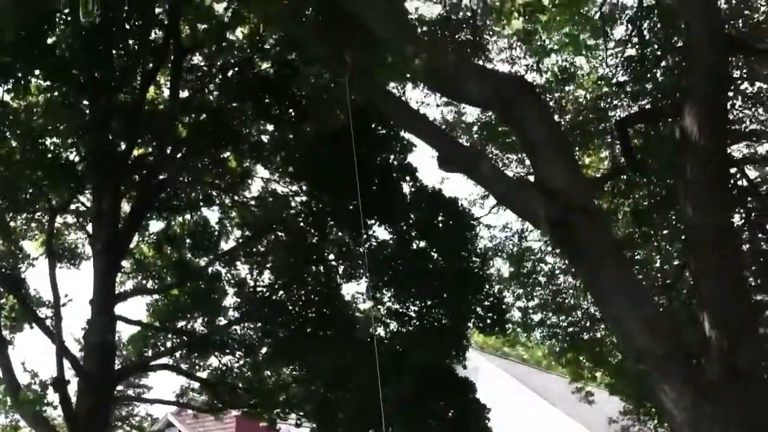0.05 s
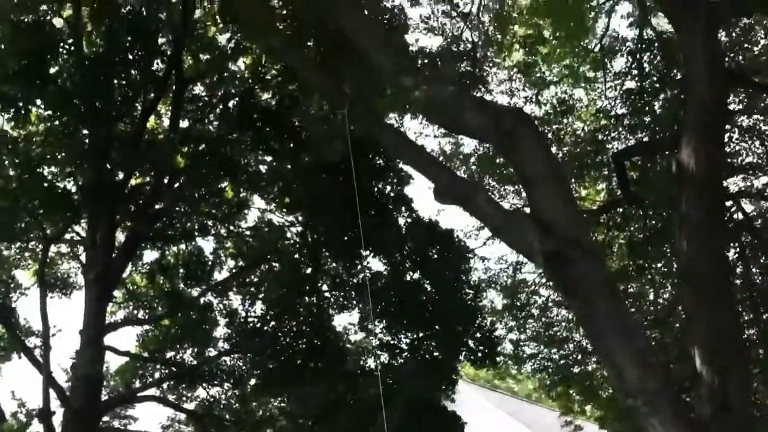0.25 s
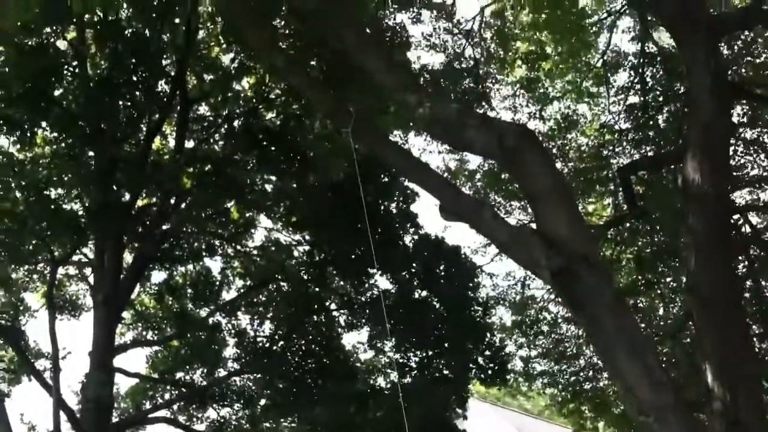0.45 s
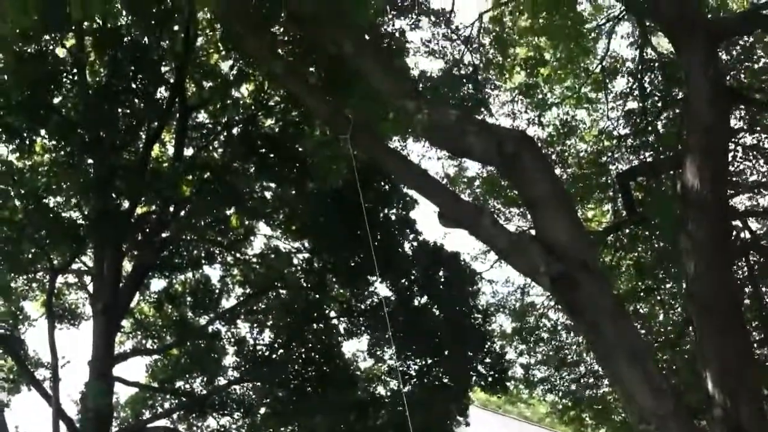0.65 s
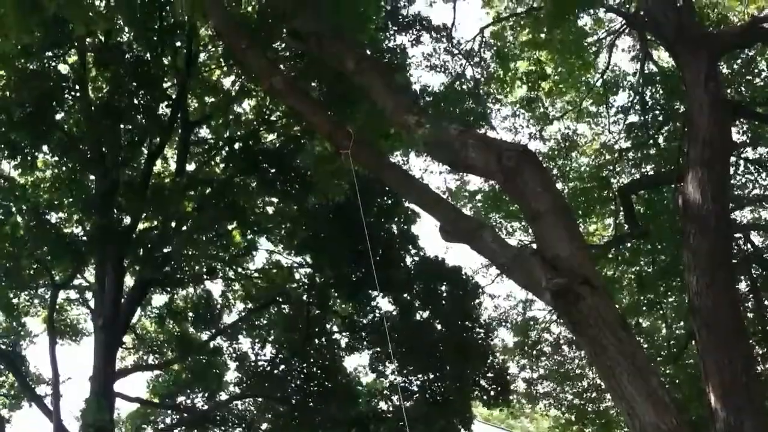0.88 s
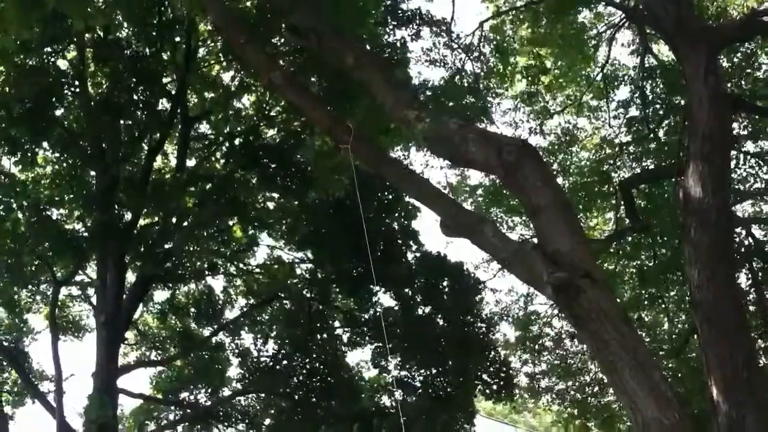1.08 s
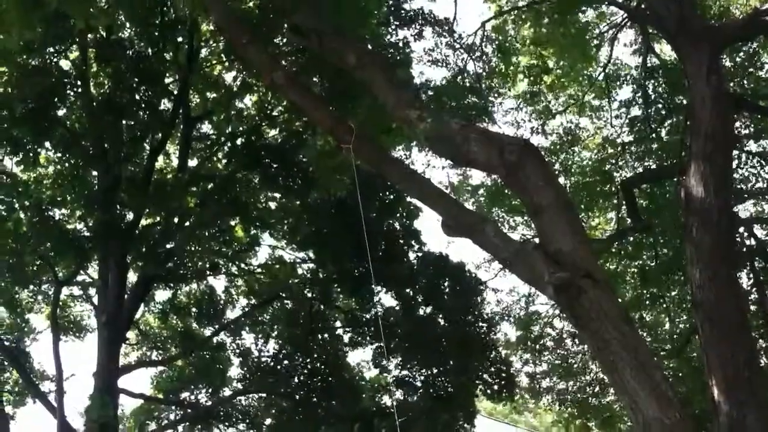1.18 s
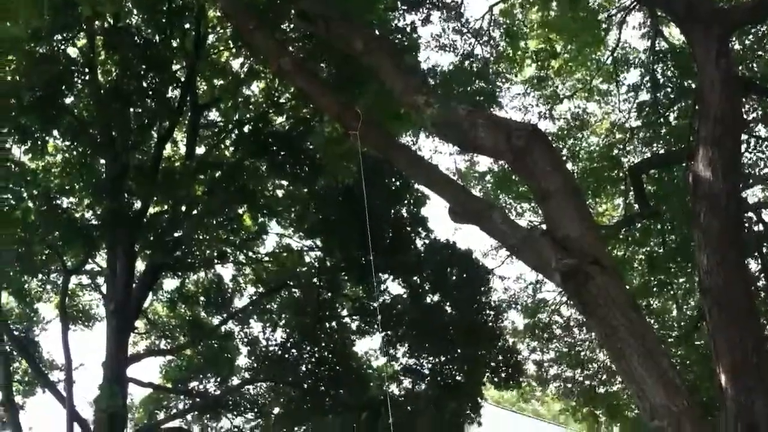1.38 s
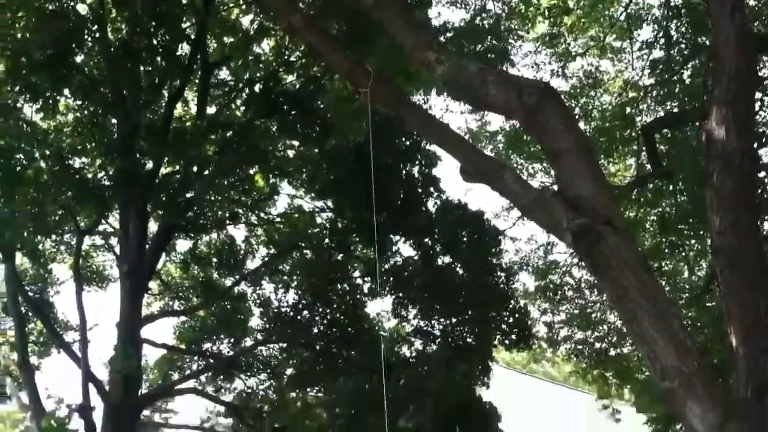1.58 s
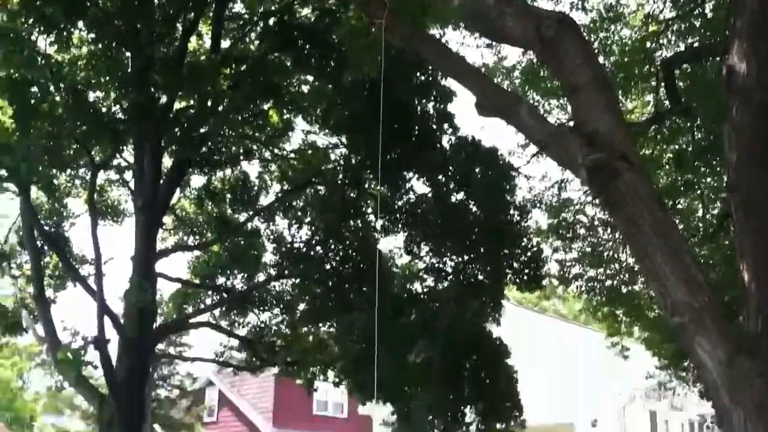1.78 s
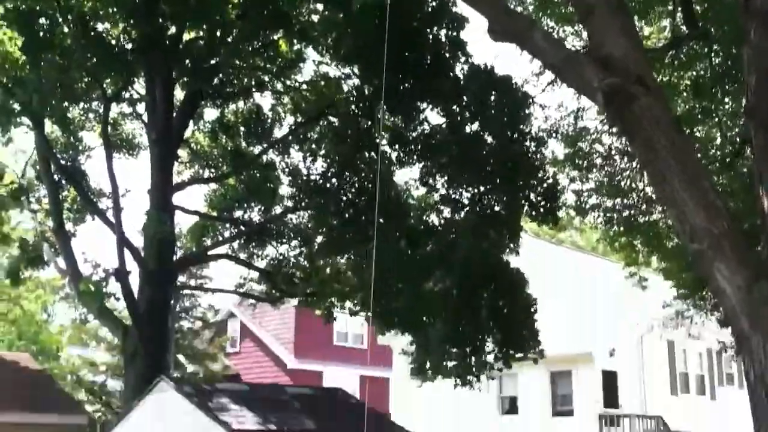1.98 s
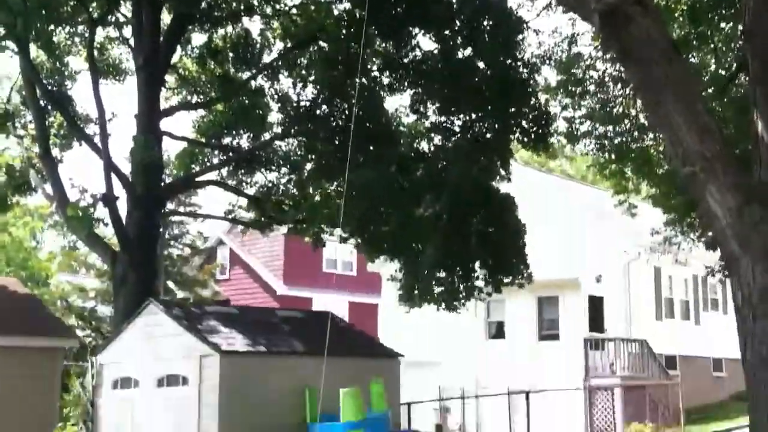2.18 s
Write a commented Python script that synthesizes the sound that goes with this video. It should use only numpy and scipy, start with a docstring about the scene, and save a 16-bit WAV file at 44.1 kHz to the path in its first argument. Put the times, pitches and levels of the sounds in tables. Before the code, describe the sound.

Low wind rumble flutters on a bare microphone beneath trees, surging twice with sputters and dull thumps before easing off. Far behind it are a faint hiss of leaves and a few thin, distant chirps.

```python
"""Wind buffets a bare microphone: two strong gusts, then a weak, uneven breeze.
The flow rumbles on the microphone's port; in the gusts small eddies sputter over it
and big ones land as single thumps. Behind it, leaves hiss faintly in the trees overhead,
with a few thin, far chirps."""
import sys
import numpy as np
from scipy import signal
from scipy.fft import rfft, irfft, next_fast_len
from scipy.io import wavfile
from scipy.ndimage import uniform_filter1d

SR = 44100
rng = np.random.default_rng(int(sys.argv[2]) if len(sys.argv) > 2 else 0)


def dump(signal):
    """Clip the signal to [-1, 1] and save it as 16-bit WAV at the path in sys.argv[1]."""
    limited = np.clip(np.atleast_2d(signal).T, -1, 1)
    pcm = np.round(limited * 32767).astype(np.int16)
    wavfile.write(sys.argv[1], SR, pcm)


N = 99225
T = np.arange(N) / SR
FFT_SIZE = next_fast_len(N + SR // 4)
BIN_HZ = np.maximum(np.arange(FFT_SIZE // 2 + 1) * SR / FFT_SIZE, 1)


def from_db(db):
    """Decibels to gain."""
    return 10 ** (np.asarray(db) / 20)


def unit_rms(x):
    """Normalise to rms 1."""
    return x / np.sqrt(np.mean(x ** 2) + 1e-20)


def fader(points, glide_s=0.013):
    """A level ride in dB through (time, level) points, its corners rounded."""
    times, db = np.transpose(points)
    return uniform_filter1d(np.interp(T, times, db), int(glide_s * SR))


def equalise(x, points):
    """Shape the tone with an EQ curve of (frequency, level) points, then normalise to rms 1."""
    hz, db = np.transpose(points)
    gain = from_db(np.interp(np.log(BIN_HZ), np.log(hz), db))
    return unit_rms(irfft(rfft(x, FFT_SIZE) * gain, FFT_SIZE)[:N])


def wobble(rate_hz):
    """A smooth random modulator of rms 1."""
    pole = np.exp(-2 * np.pi * rate_hz / SR)
    smooth = signal.lfilter([1], [1, -2 * pole, pole * pole], rng.standard_normal(N + SR))
    return unit_rms(smooth[SR:])


def even_out(x, window_s=0.036):
    """Hold the short-term rms near 1, so that a fader sets the dynamics."""
    size = int(window_s * SR)
    power = uniform_filter1d(uniform_filter1d(x * x, size), size)
    return x / np.sqrt(np.abs(power) + 1e-6)


# Far chirp cues: (centre time [s], length [s], pitch [Hz], bandwidth [Hz], level [dB])
CHIRP_CUES = [(.435, .055, 3230, 450, -69), (.42, .06, 4350, 600, -73), (1.023, .022, 2380, 180, -63.5),
              (1.069, .028, 2530, 220, -64), (1.03, .06, 4400, 900, -70), (1.385, .045, 3330, 190, -67),
              (1.46, .04, 3250, 200, -71), (1.955, .03, 2500, 300, -70)]
def far_chirps():
    """Thin, blurred whistles far off: narrow bands of noise that swell and fade."""
    out = np.zeros(N)
    for centre_s, length_s, hz, width_hz, level_db in CHIRP_CUES:
        band = signal.butter(2, [hz - width_hz / 2, hz + width_hz / 2], "band", fs=SR, output="sos")
        whistle = unit_rms(signal.sosfilt(band, rng.standard_normal(N)))
        swell = np.exp(-2 * ((T - centre_s) / length_s) ** 2)
        out += whistle * from_db(level_db) * swell
    return out


# Tone of the bed of leaves and far air: (frequency [Hz], relative level [dB])
HISS_EQ = [(25, 3), (150, 9.5), (400, -3), (700, 0.5), (1100, -2.5), (1600, -6.5), (2300, -9), (3300, -9),
           (4600, -10.5), (5100, -12.5), (6500, -13), (9000, -17), (11000, -23), (13000, -31), (15500, -42)]
# Nearly flat ride of that bed, before its boost: (time [s], level [dB])
HISS_RIDE = [(0.03, -64), (0.42, -65), (0.77, -65), (1.04, -64.5), (2.12, -66), (2.22, -65.5)]
# Midrange tone of the soft rustle: (frequency [Hz], relative level [dB])
RUSTLE_EQ = [(400, -23), (800, -6), (1200, -2.5), (1900, -1), (2700, -10), (5000, -31), (12000, -62.5)]
# Swells of the rustle: (time [s], level [dB])
RUSTLE_RIDE = [(0, -70), (.17, -67.5), (.32, -77.5), (1.0, -74.5), (1.6, -78), (2.0, -69), (2.25, -68)]
def leaves(hiss_boost_db=7):
    """Foliage overhead: a faint, even bed of hiss and a soft rustle that comes and goes."""
    hiss = equalise(rng.standard_normal(N), HISS_EQ) * from_db(fader(HISS_RIDE) + hiss_boost_db)
    rustle = equalise(rng.standard_normal(N), RUSTLE_EQ) * from_db(fader(RUSTLE_RIDE))
    return hiss + rustle


# Tone of the rumble in a light breeze: (frequency [Hz], relative level [dB])
RUMBLE_EQ = [(25, -37.5), (50, -28.5), (75, -15), (105, -6.5), (135, -2), (168, 1), (200, -2.5),
             (260, -4.5), (350, -13), (500, -27), (700, -46.5), (1200, -59), (3000, -110)]
# Gusts and lulls of the flow, before trim and flutter: (time [s], level [dB])
FLOW_RIDE = [(0.0, -30.5), (0.04, -43.5), (0.06, -35), (0.095, -39), (0.12, -35), (0.19, -45), (0.23, -32),
             (0.255, -28.5), (0.29, -43.5), (0.315, -25), (0.375, -20.5), (0.41, -22.5), (0.45, -22),
             (0.475, -25.5), (0.54, -24.5), (0.565, -27.5), (0.595, -24), (0.64, -26.5), (0.66, -28.5),
             (0.735, -27), (0.755, -40), (0.78, -28), (0.82, -34), (0.85, -43.5), (0.885, -30.5),
             (0.91, -19), (0.96, -23), (1.03, -19.5), (1.08, -24), (1.11, -24.5), (1.15, -28.5),
             (1.21, -26.5), (1.24, -25.5), (1.27, -19), (1.29, -28), (1.53, -33), (1.55, -31), (1.59, -52),
             (1.615, -34), (1.635, -52.5), (1.66, -39), (1.69, -31), (1.71, -40), (1.73, -30), (1.78, -42),
             (1.805, -37), (1.83, -37.5), (1.89, -42), (1.945, -40), (1.98, -31), (2.015, -43),
             (2.06, -59.5), (2.14, -50.5), (2.175, -38.5), (2.22, -38), (2.25, -48)]
def wind_rumble(trim_db=-0.5, flutter_db=3, breeze_db=-37, lull_db=-62, pivot_hz=173):
    """Turbulence on the port: fluttering low noise that opens up as the flow grows."""
    flow_db = fader(FLOW_RIDE)
    tilt_db_per_octave = 0.67 * (np.maximum(flow_db, lull_db) - breeze_db)
    spectrum = rfft(equalise(rng.standard_normal(N), RUMBLE_EQ), FFT_SIZE)
    octave = np.clip(np.log2(BIN_HZ / pivot_hz), -1, 2)
    rumble = np.zeros(N)
    for centre in (-0.88, -0.17, 0.67, 1.69):   # overlapping bands, in octaves from the pivot
        band = irfft(spectrum * np.maximum(1 - abs(octave - centre), 0), FFT_SIZE)[:N]
        rumble += band * from_db(tilt_db_per_octave * centre)
    return even_out(rumble) * from_db(flow_db + trim_db + flutter_db * wobble(rate_hz=82))


# Tone of the dull eddies of slow flow: (frequency [Hz], relative level [dB])
DULL_EDDY_EQ = [(60, -26.5), (150, -3.5), (300, 2.5), (450, 3), (650, -10), (900, -16), (1300, -47),
                (2000, -63), (5000, -120)]
# Tone of the sharp eddies of fast flow: (frequency [Hz], relative level [dB])
SHARP_EDDY_EQ = [(60, -30.5), (150, -6.5), (300, 0), (500, 4), (700, -2), (1000, -16.5), (1300, -26.5),
                 (1700, -40), (2400, -50.5), (5000, -110)]
# Bursts of sputter, before trim and soft gate: (time [s], level [dB])
SPUTTER_RIDE = [(0.0, -48.5), (0.13, -53), (0.2, -60), (0.23, -31), (0.255, -39.5), (0.29, -66),
                (0.335, -35), (0.35, -23.5), (0.37, -24.5), (0.39, -29.5), (0.41, -41), (0.43, -31.5),
                (0.49, -29), (0.54, -29.5), (0.565, -37.5), (0.585, -28.5), (0.63, -43.5), (0.68, -31),
                (0.715, -40.5), (0.81, -34.5), (0.835, -48.5), (0.865, -50.5), (0.885, -35.5),
                (0.91, -27.5), (0.98, -30.5), (1.008, -48.5), (1.035, -22.5), (1.065, -38.5),
                (1.105, -23.5), (1.135, -38.5), (1.21, -42), (1.23, -29.5), (1.248, -50), (1.265, -34),
                (1.3, -43.5), (1.34, -34.5), (1.38, -37.5), (1.44, -46.5), (1.53, -60), (1.58, -59),
                (1.68, -52.5), (1.73, -52), (1.77, -75), (2.25, -70)]
def eddy_sputter(eddies_per_s=520, spread_db=3.0, trim_db=0.5, slow_db=-52, fast_db=-31.5, gate_db=-56):
    """Small eddies cross the port as random pressure pulses; the faster the flow, the more are sharp."""
    level_db = fader(SPUTTER_RIDE)
    arrivals = rng.random(N) < eddies_per_s / SR
    sizes = from_db(spread_db * np.minimum(rng.exponential(1, N), 4))
    pulses = arrivals * sizes * rng.choice([-1, 1], N)
    speed = np.clip((level_db - slow_db) / (fast_db - slow_db), 0, 1)
    is_sharp = rng.random(N) < 0.59 * speed
    dull = equalise(pulses * ~is_sharp, DULL_EDDY_EQ)
    sharp = equalise(pulses * is_sharp, SHARP_EDDY_EQ) * from_db(-1.5)
    soft_gate = 1 / (1 + from_db(gate_db - level_db) ** 2)   # weak flow sheds hardly any eddies
    return even_out(dull + sharp) * from_db(level_db + trim_db) * soft_gate


# Hits of the big eddies: (time [s], peak level before trim [dB], pulse corner [Hz], swing [Hz])
THUMP_CUES = [(0.0174, -22.5, 333, 300.0), (0.0318, -23.5, 298, 260.0), (0.11, -26.5, 273.0, 165.0),
              (0.158, -29.5, 202, 220.0), (0.2341, -14, 410, 350.0), (0.2555, -18.5, 373.0, 140.0),
              (0.2769, -21, 416, 140.0), (0.3117, -14, 348, 300.0), (0.3255, -20.5, 540, 160),
              (0.3515, -7.5, 600, 220), (0.3552, -10.5, 509.0, 140.0), (0.3849, -3.5, 557, 140.0),
              (0.3939, -10.5, 617, 189), (0.4007, -16, 536.0, 140.0), (0.4335, -10, 459.0, 165.0),
              (0.4564, -15, 644, 139), (0.472, -16.0, 600, 140.0), (0.4803, -13, 550, 140.0),
              (0.508, -13.5, 595, 141), (0.5201, -8.5, 435.0, 140.0), (0.5339, -8, 509.0, 140.0),
              (0.5411, -7.5, 460, 190.0), (0.5824, -12, 396, 140.0), (0.597, -13.5, 354.0, 140.0),
              (0.617, -17.5, 400, 200), (0.6571, -8.5, 350, 220.0), (0.679, -21.5, 670, 220),
              (0.6938, -14, 565, 165), (0.733, -13.5, 300, 240), (0.7583, -19.5, 510, 140.0),
              (0.7761, -14, 393.0, 140.0), (0.791, -13.5, 480, 140.0), (0.7998, -19, 620, 160),
              (0.8123, -12.5, 402, 140.0), (0.846, -25, 330, 280), (0.886, -21, 380, 280),
              (0.8996, -8.5, 560, 260.0), (0.9031, -7.5, 570, 220.0), (0.9175, -12, 570, 220.0),
              (0.922, -11, 690, 160), (0.9343, -15.5, 720, 218), (0.94, -15, 430, 200),
              (0.9601, -17, 650, 140), (0.9651, -14.5, 642, 141), (0.975, -12.5, 435.0, 140.0),
              (0.991, -9.5, 520, 140.0), (1.0194, -9, 393.0, 190.0), (1.0307, -11.5, 435.0, 140.0),
              (1.0377, -5.5, 453, 140.0), (1.0435, -11.5, 467, 140.0), (1.0881, -18.5, 660, 140),
              (1.098, -12.5, 495, 140.0), (1.1026, -9, 506, 165.0), (1.1142, -16, 459.0, 165.0),
              (1.124, -13, 377, 140.0), (1.186, -20, 400, 200), (1.21, -15.5, 314, 200),
              (1.2238, -11, 584, 140), (1.2327, -14.5, 746, 160), (1.26, -6, 420, 150),
              (1.3063, -11, 307, 140.0), (1.3352, -12, 350, 300.0), (1.3689, -10.5, 380, 350.0),
              (1.4173, -15, 303.0, 220.0), (1.5079, -20.5, 299, 140.0), (1.5463, -16.5, 253, 140.0),
              (1.609, -22, 325, 230), (1.6804, -17.5, 215, 140.0), (1.7449, -21.5, 378, 188),
              (1.815, -26.0, 214, 165.0), (1.925, -24, 261, 165), (1.964, -22.5, 198, 165),
              (1.9737, -22, 198, 170), (2.2034, -23, 190, 165.0)]
def eddy_thumps(trim_db=-2, swing_q=1.38, wake_delay_s=0.00298, wake_max_db=-5):
    """A big eddy is a bell-shaped pressure pulse that swings back through the port, trailing a smaller one."""
    out = np.zeros(N + SR)
    pre_roll = SR // 100
    t = np.arange(-pre_roll, 10 * pre_roll) / SR
    wakes = rng.uniform(-0.99, 1, (len(THUMP_CUES), 2))
    for (time_s, peak_db, corner_hz, swing_hz), (lateness, strength) in zip(THUMP_CUES, wakes):
        eddy = np.exp(-.5 * (2 * np.pi * corner_hz * t) ** 2)
        wake = np.exp(-.5 * (2 * np.pi * corner_hz * (t - wake_delay_s * 2 ** lateness)) ** 2)
        w = 2 * np.pi * swing_hz
        port = signal.bilinear([1, 0, 0], [1, w / swing_q, w * w], SR)   # resonant high-pass
        thump = signal.lfilter(*port, eddy + from_db(wake_max_db) * strength * wake)
        start = int(time_s * SR) - pre_roll
        out[start:start + len(t)] += from_db(peak_db + trim_db) * thump / np.abs(thump).max()
    return out[:N]


def scene(low_cut_hz=101.6, wind_top_hz=4000):
    """Mono mix: wind up front, thinned by the microphone's low cut, with the trees behind."""
    wind = wind_rumble() + eddy_sputter() + eddy_thumps()
    wind_band = signal.butter(3, [low_cut_hz, wind_top_hz], "band", fs=SR, output="sos")
    return (signal.sosfilt(wind_band, wind) + leaves() + far_chirps())[None]


def record(dry, stopband_hz=16700):
    """A steep high cut takes the very top off the mix."""
    return signal.sosfilt(signal.cheby2(12, 70, stopband_hz, fs=SR, output="sos"), dry)


dry = scene()
out = record(dry)
dump(out)
```